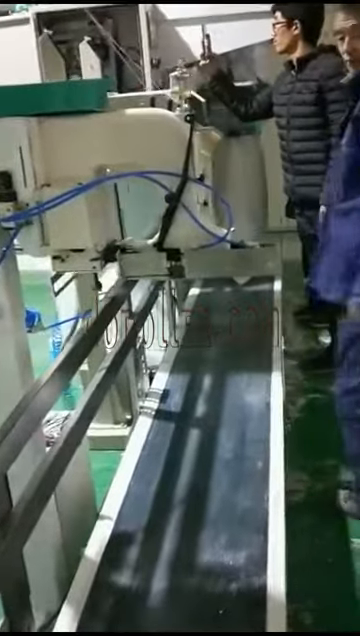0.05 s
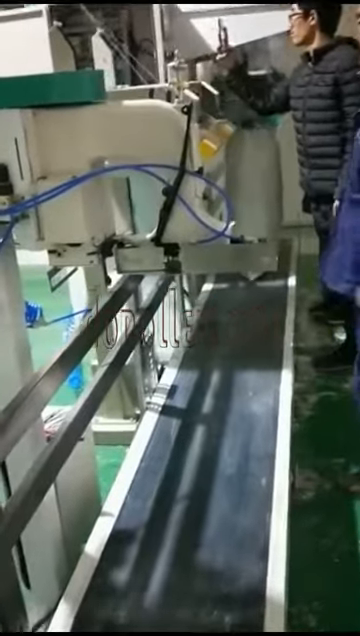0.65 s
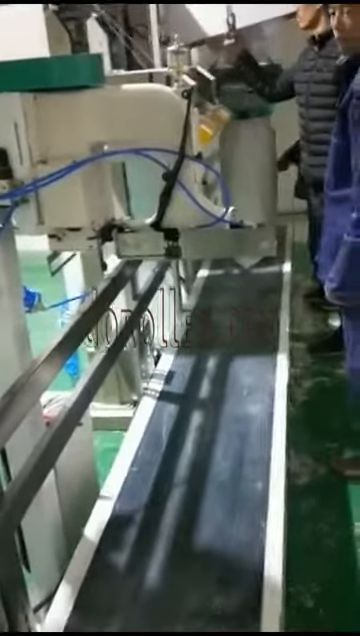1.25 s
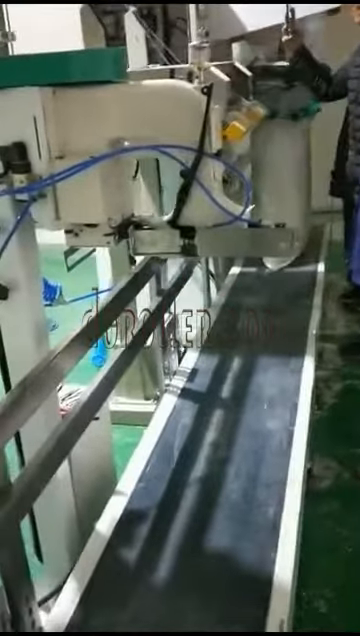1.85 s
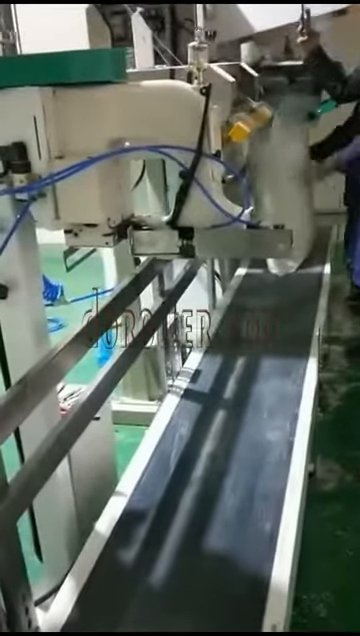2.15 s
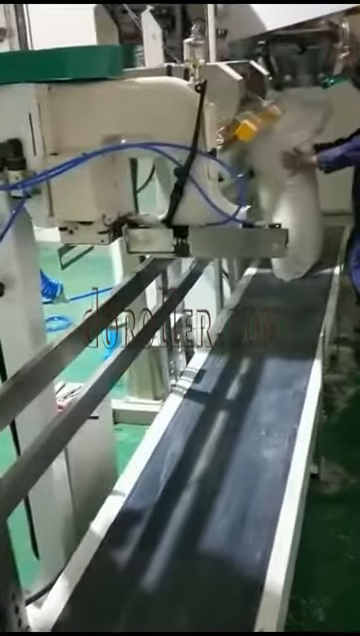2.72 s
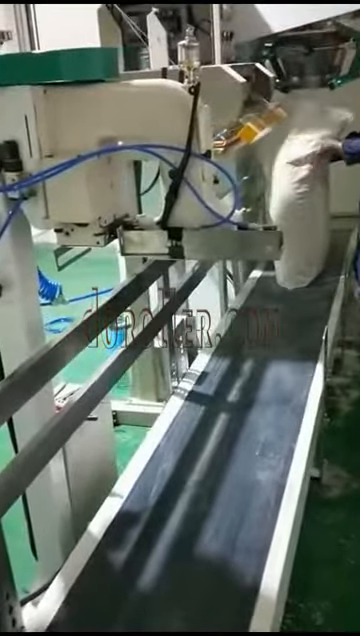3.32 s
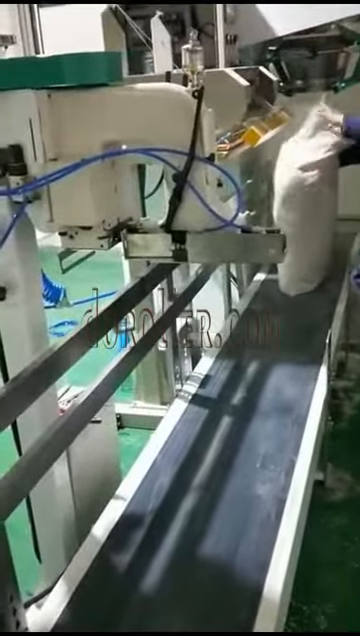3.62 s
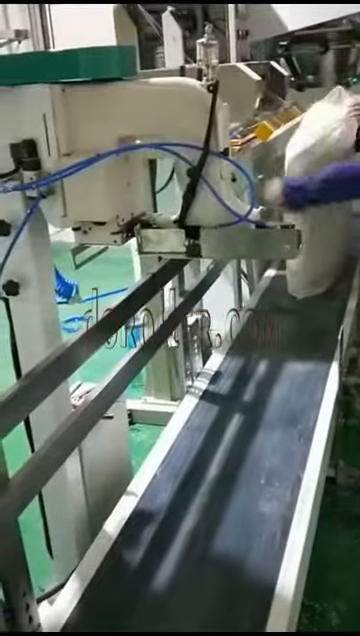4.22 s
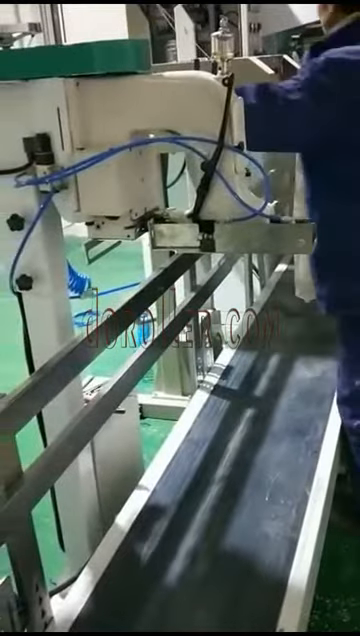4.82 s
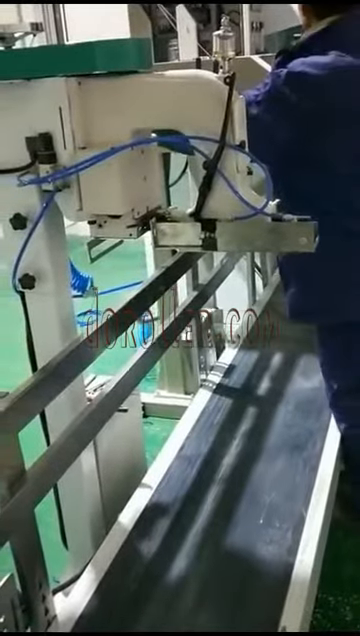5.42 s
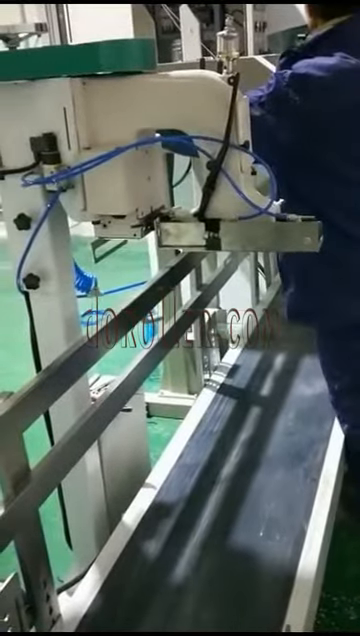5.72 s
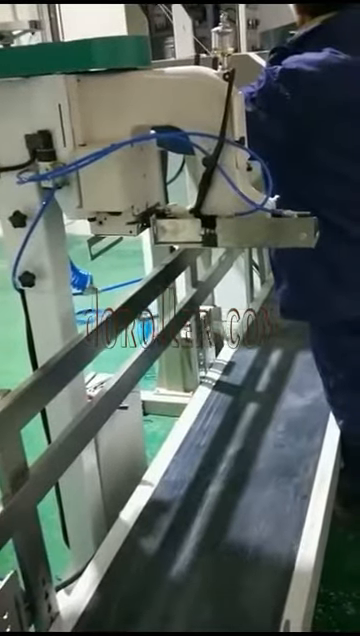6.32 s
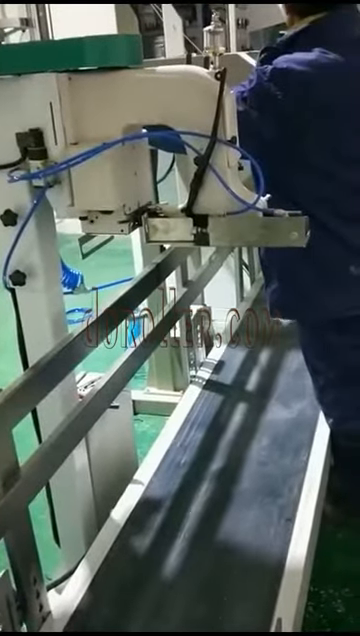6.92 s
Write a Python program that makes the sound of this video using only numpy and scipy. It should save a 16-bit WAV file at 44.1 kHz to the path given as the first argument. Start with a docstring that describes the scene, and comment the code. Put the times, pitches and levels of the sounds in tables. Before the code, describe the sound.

Compressed air hisses and puffs several times at a bag-filling station, with a few short, high squeals. The last puff comes with a brief metallic ring as the clamp lets go. After that, a woven sack crinkles lightly as it is handled. Throughout, heard from beside the filler in an echoing mill hall, heavy machinery rumbles loudly, motors hum and whine, and grain and air rush through pipes.

```python
"""Hard-walled flour mill hall, at a bag-filling station. Mills and ducts rumble, drives hum,
motors, gears and a fan whine, grain and air rush through pipes. Compressed air hisses and whistles
at the filler; valves vent in short puffs, the last as the clamp lets the full sack go.
The woven sack rustles as it is pulled upright on the belt."""
import sys
import numpy as np
from scipy import signal
from scipy.fft import rfft, irfft
from scipy.io import wavfile
from scipy.ndimage import uniform_filter1d

SR = 44100
rng = np.random.default_rng(int(sys.argv[2]) if len(sys.argv) > 2 else 0)


def master_out(mix):
    """Clip the mix to full scale and print it as 16-bit PCM to the path in sys.argv[1]."""
    frames = np.transpose(np.atleast_2d(mix))
    ceiling = np.clip(frames, -1, 1)
    pcm = np.round(ceiling * 32767).astype(np.int16)
    wavfile.write(sys.argv[1], SR, pcm)


N = 315756
TIME_S = np.arange(N) / SR
FREQS_HZ = np.maximum(np.fft.rfftfreq(N, 1 / SR), 1)

# likeness of the two ears in the hall: f/Hz, correlation
EAR_CORRELATION = [(100, 1), (200, 0.97), (330, 0.82), (520, 0.24), (850, 0.79), (1300, -0.15),
                   (1800, -0.098), (2500, 0.011), (4000, -0.0099)]
# plant noise balance, left positive: f/Hz, pan/dB
PLANT_PAN = [(90, -1.5), (170, 0), (430, 4), (680, -4), (1000, 0), (1350, 0), (2150, 8), (2550, -2),
             (3800, 4), (4700, -1), (8000, -2)]
# plant shifting from right to centre: t/s, pan/dB
PLANT_SHIFT = [(0, -2.5), (1, -2.5), (1.8, -0.5), (2.5, 0.5), (7.16, 0.1)]
# filler and sack balance: f/Hz, pan/dB
FILLER_PAN = [(700, -3), (2000, 3), (5000, -1), (10000, -1), (13300, 2), (14400, -2), (15500, -12)]

# mill rumble: f/Hz, density/dB
RUMBLE_SPECTRUM = [(10, -17.5), (25, -12.5), (42, -18.5), (60, -4.5), (76, -10), (92, -1), (125, -2.5),
                   (180, 1), (215, 2), (240, -3), (330, -5.5), (420, -9.5), (600, -21.5), (1000, -81.5)]
# duct and casing booms: f/Hz, width/Hz, lift/dB
DUCT_MODES = [(47.6, 4.1, 5.5), (83, 39, 7), (93, 25, 6), (114.4, 31, 4.5), (128.7, 2.5, 1.5),
              (132.8, 4.8, 10), (165.7, 16, 4.5), (188, 16, 5.5), (311, 5.5, 3.5), (324, 5.4, 2.5)]
# rumble base levels: t/s, deep/dB, body/dB
RUMBLE_LEVELS = [(0.0, -26.5, -22.6), (1.0, -21.0, -22.0), (2.0, -26.6, -21.7), (2.8, -21.7, -23.8),
                 (3.3, -28.0, -23.1), (4.3, -24.7, -22.2), (5.9, -23.3, -21.3), (7.16, -28.0, -25.5)]
# rumble top band: t/s, level/dB
RUMBLE_TOP_LEVEL = [(0, -27), (1, -27), (2, -28), (3.4, -29.5), (4.4, -29.5), (5.9, -27.5), (7.16, -27.5)]
# rumble heaves: t/s, length/s, deep lift/dB, body lift/dB
SURGES = [(-0.1, 0.32, 4.0, 2.0), (0.34, 0.11, 5.0, 0.0), (0.48, 0.3, 5.0, 1.5), (0.89, 0.36, 0.0, 3.5),
          (1.37, 0.22, 5.0, 2.0), (1.71, 0.32, 5.5, 2.5), (1.93, 0.19, 8.0, 0.0), (2.25, 0.23, 4.0, 2.0),
          (2.73, 0.26, 3.0, 0.0), (2.96, 0.17, 2.5, 0.5), (3.1, 0.36, 3.0, 0.0), (3.49, 0.16, 7.0, 0.0),
          (3.63, 0.18, 6.0, 1.0), (3.77, 0.18, 5.5, 0.0), (4.05, 0.16, 5.0, 0.5), (4.23, 0.11, 2.5, 0.0),
          (4.56, 0.2, 3.5, 0.5), (4.95, 0.2, 3.5, 0.0), (5.22, 0.36, 0.0, 1.5), (5.47, 0.12, 0.5, 3.0),
          (5.66, 0.29, 1.0, 2.0), (6.1, 0.15, 3.0, 5.5), (6.31, 0.12, 1.5, 2.0), (6.47, 0.22, 6.5, 0.0),
          (6.67, 0.29, 3.5, 3.0), (6.85, 0.36, 5.5, 4.5)]
# drive hums: f/Hz, level/dB re rumble
HUMS = [(48.8, -18.5), (98.3, -12), (142, -11.5), (215.3, -9.5), (368.5, -25)]
# stronger twin drive: t/s, level/dB re rumble
TWIN_LEVEL = [(0, -12), (.6, -3), (1.4, 0.5), (2.2, -13), (2.8, -1.5), (3.15, -15), (7.16, -6.5)]
# nearest motor: t/s, level/dB
MOTOR_LEVEL = [(0, -37), (.55, -44), (.75, -36), (1.35, -42), (1.5, -38), (1.92, -36.5), (2.08, -39),
               (2.22, -32), (2.45, -42), (3.0, -35.5), (3.55, -42), (3.8, -37), (4.05, -43), (4.3, -36),
               (4.48, -39), (4.6, -32), (5.0, -38), (5.45, -44), (5.72, -33), (6.1, -44), (6.38, -40),
               (6.5, -32.5), (6.7, -44), (7.16, -39)]
# motor and fan whines: f/Hz, relative level/dB, pan/dB
WHINES = [(485, -46, 2), (528, -46.5, 8), (548, -51, 0), (641, -51, 4), (676.5, -47.5, -2),
          (754, -50.5, -9), (787, -55, 0), (832, -51, -5), (861, -46.5, 3), (961, -55, 0), (1020, -50, 8),
          (1096, -53, 2), (1257, -50.5, 8), (1379, -57, 2), (1397, -57, 2), (1434, -57, 2), (1733, -55, 5),
          (1925, -52, 6), (2229, -55.5, 7), (2415, -56, 1), (2528, -55.5, 1), (2680, -61, 5),
          (4215, -65, 0)]
# gear mesh overtones: multiple, relative level/dB, pan/dB
MESH_OVERTONES = [(6, -54, -4), (9, -51, 11), (10, -53, 14), (13, -57, 11), (14, -57, 11), (19, -60, 9),
                  (20, -60, 6), (21, -63, 3), (22, -66, 1), (25, -63, 8), (26, -63, 10)]
# fan tone, swelling once: t/s, level/dB
FAN_LEVEL = [(0, -47.5), (1.2, -43), (1.7, -39), (1.86, -38), (1.95, -43), (2.2, -45), (7.16, -45.3)]
# grain and air in the pipes: f/Hz, density/dB
WASH_SPECTRUM = [(200, -29.5), (450, 6), (720, 2.5), (950, 0.5), (1200, -2), (1700, -3.5), (2250, -8),
                 (2550, -8), (3900, -13.5), (4600, -15.5), (6000, -15), (7200, -24.5), (8500, -43),
                 (10500, -73), (15000, -66)]
# pipe wash: t/s, level/dB
WASH_LEVEL = [(0, -30.5), (2.8, -32), (3.3, -33.5), (4, -31.5), (5.5, -32.5), (7.16, -31.5)]
# pipe walls: f/Hz, width/Hz, lift/dB
PIPE_MODES = [(2200, 200, 6.5), (3220, 64, -2), (3750, 70, 2), (3900, 72, 2.5)]

# air jet hiss: f/Hz, density/dB
JET_SPECTRUM = [(900, -14), (2000, -2), (3000, -.5), (4600, -1), (5700, 2), (6600, -2), (7500, -7),
                (8500, -11), (9700, -15), (10700, -12), (11900, -13), (13200, -6), (14500, -5), (15800, -7)]
# spout and shroud: f/Hz, width/Hz, lift/dB
SPOUT_MODES = [(1040, 50, 9), (2050, 260, 1.5), (2420, 250, -3), (3450, 650, 2.5), (4230, 140, -3),
               (4620, 180, -3), (4950, 140, -2), (5850, 500, 1.2), (6900, 350, -2.5), (7200, 130, 3),
               (7780, 110, 3)]
# jet openings: t/s, length/s, level/dB, pressure sag/(dB/s)
JET_BURSTS = [(-.07, 0.081, -25, 10), (0.23, 0.64, -26, 5.5), (0.83, 0.26, -28.5, -7),
              (1.416, 0.53, -32, -1.5), (1.82, 0.76, -26.5, 3)]
# filler casing ring: f/Hz, density/dB
CASING_SPECTRUM = [(120, -27), (220, -1), (380, -2.5), (600, -4.5), (900, -12.5), (1400, -15), (3000, -27),
                   (5500, -24.5), (9000, -45)]
# valves cracking open: t/s, level/dB, rise/s, hold/s, t60/s
SPITS = [(.245, -31, .045, .06, .5), (1.89, -27.5, .012, .04, .4), (2.562, -28.8, .02, .018, .3)]
# valves venting: t/s, level/dB, rise/s, hold/s, body t60/s
PUFFS = [(0.802, -28.5, 0.024, 0.15, 2.4), (1.868, -31, 0.027, 0.17, 1.9), (2.537, -21, 0.034, 0.044, 1.8)]
# vented air: f/Hz, density/dB
PUFF_SPECTRUM = [(500, -24), (800, 2), (1030, 0.5), (1400, 2.5), (1950, 3.5), (2800, -1.5), (4500, -0.5),
                 (5500, 3), (6800, -4.5), (8200, -12), (10000, -41), (15000, -32)]
# spout edge tones: t/s, length/s, start/Hz, end/Hz, roughness 0-1, level/dB
WHISTLES = [(.812, .042, 1880, 1940, .95, -27.5), (.872, .055, 1980, 2070, .95, -29),
            (1.635, .06, 2040, 2070, .2, -36), (1.65, .17, 1870, 1935, .9, -36.5),
            (1.69, .17, 1830, 1855, .85, -36), (1.795, .06, 1985, 2050, .4, -36.5),
            (1.848, .068, 2046, 2038, .12, -29), (1.968, .048, 2030, 2058, .3, -33.5),
            (2.105, .06, 2042, 2042, .1, -34.5)]
# clamp release: f/Hz, density/dB
JAW_SPECTRUM = [(700, -8), (2000, -7), (4000, -30), (9000, -51)]
# clamp jaws: f/Hz, width/Hz, lift/dB
JAW_MODES = [(845, 25, 16), (1020, 55, 26), (1130, 30, 20), (1290, 30, 16), (1950, 70, 14)]

# sack handling: t/s, length/s, level/dB
RUSTLES = [(3.253, .07, -65), (3.42, .07, -49), (3.69, 0.23, -42), (3.91, 0.31, -40), (4.126, 0.25, -44.5),
           (4.336, 0.27, -46), (4.844, .04, -56), (4.91, .05, -58), (5.018, 0.12, -49), (5.135, 0.19, -50),
           (5.33, 0.14, -56), (5.476, 0.12, -59), (5.97, .05, -60), (6.14, .05, -55), (6.26, .04, -53),
           (6.495, .05, -57), (6.638, 0.34, -48), (6.93, 0.28, -49.5)]
# creases snapping: t/s, level/dB
SNAPS = [(3.432, -52), (3.728, -44), (4.266, -47), (5.030, -46), (5.325, -45), (6.138, -41), (6.184, -47),
         (6.955, -50)]
# crinkling weave: f/Hz, density/dB
CLOTH_SPECTRUM = [(1500, -3), (3000, 5), (6000, 7), (8000, -3), (10000, -17.5), (12000, -14.5),
                  (14000, -5.5), (15800, -22.5)]
# sack on the guide: f/Hz, density/dB
SWISH_SPECTRUM = [(3000, -1), (5000, -3.5), (6200, -1.5), (7400, -4.5), (8600, -2.5), (9600, -16),
                  (11000, -25), (15000, -33)]


def from_db(db):
    """Decibels to gain."""
    return 10 ** (np.asarray(db) / 20)


def unit_rms(x):
    """Scale to unit power."""
    return x / np.sqrt(np.mean(x ** 2) + 1e-20)


def over_time(rows):
    """Interpolate (t/s, value) rows."""
    return np.interp(TIME_S, *np.transpose(rows))


def over_freq(rows):
    """Interpolate (f/Hz, value) rows in log frequency."""
    hz, value = np.transpose(rows)
    return np.interp(np.log(FREQS_HZ), np.log(hz), value)


def panned(pan_db):
    """Constant-power left and right gains."""
    gains = from_db(np.array([[.5], [-.5]]) * pan_db)
    return gains / np.sqrt(np.mean(gains ** 2, axis=0))


def drift(rate_hz):
    """Smooth random curve, rms 1."""
    step, settle = 40, 2000
    pole = np.exp(-2 * np.pi * rate_hz * step / SR)
    white = rng.standard_normal(N // step + settle + 2)
    slow = signal.lfilter([1], [1, -2 * pole, pole * pole], white)[settle:]
    return np.interp(np.arange(N) / step, np.arange(len(slow)), unit_rms(slow))


def hall_noise(spectrum, pan, modes=()):
    """Diffuse noise coloured by modes: ears alike in the bass, unrelated in the treble; rms 1."""
    mid, side = rfft(rng.standard_normal((2, N)))
    alike = over_freq(EAR_CORRELATION)
    ears = np.sqrt(1 + alike) * mid + np.sqrt(1 - alike) * side * [[1], [-1]]
    low_cut = np.minimum(FREQS_HZ / spectrum[0][0], 1) ** 2
    lift = 1 + sum((from_db(db) - 1) / (1 + (2 * (FREQS_HZ - hz) / width_hz) ** 2)
                   for hz, width_hz, db in modes)
    colour = from_db(over_freq(spectrum)) * low_cut * lift
    return unit_rms(irfft(ears * colour * panned(over_freq(pan)), N))


def tone(hz, wander_hz, fade_db, spread_rad):
    """Wandering sine; standing waves shift its level and the phase between the ears."""
    phase = 2 * np.pi * (np.cumsum(hz + wander_hz * drift(2.99)) / SR + rng.random())
    offset = spread_rad * drift(.9) * np.array([[1], [-1]])
    fading = unit_rms(from_db(fade_db * np.tanh(drift(4.8))))
    return np.sqrt(2) * fading * np.sin(phase + offset)


def rough_tone(pitch_hz, width_hz):
    """Narrow noise around a pitch curve, independent at each ear."""
    phase = 2 * np.pi * np.cumsum(pitch_hz) / SR
    return np.array([drift(width_hz) * np.cos(phase) + drift(width_hz) * np.sin(phase)
                     for ear in range(2)])


def burst(start_s, level_db, rise_s, hold_s, t60_s):
    """Envelope: linear rise, hold, exponential decay."""
    age_s = TIME_S - start_s
    decay = np.exp(-np.log(1000) * np.maximum(age_s - rise_s - hold_s, 0) / t60_s)
    return from_db(level_db) * np.clip(age_s / rise_s, 0, 1) * decay


def hall_tail(envelope, t60_s):
    """Limit an envelope's fall to the reverberant decay."""
    fall = np.log(1000) * TIME_S / t60_s
    return np.exp(np.maximum.accumulate(np.log(envelope + 1e-12) + fall) - fall)


def arch(start_s, length_s):
    """Half-sine envelope."""
    return np.sin(np.pi * np.clip((TIME_S - start_s) / length_s, 0, 1))


def swell(start_s, length_s, level_db, t60_s):
    """Half-sine envelope with a hall tail."""
    return from_db(level_db) * hall_tail(arch(start_s, length_s), t60_s)


def split(x, hz, order=6):
    """Bands below and above hz."""
    low = irfft(rfft(x) / (1 + (FREQS_HZ / hz) ** order), N)
    return low, x - low


def levelled(x, span_s):
    """Hold power at 1 over span_s; faster beats remain."""
    count = int(span_s * SR)
    power = uniform_filter1d(np.mean(x ** 2, axis=0), count)
    return x / np.sqrt(uniform_filter1d(power, count // 2))


def drives(twin_hz=113.8, beat_hz=1.42, crest_s=.7, weaker_db=-11.5):
    """Drives hum; two at nearly the same speed beat."""
    beat = abs(1 + from_db(weaker_db) * np.exp(2j * np.pi * beat_hz * (TIME_S - crest_s)))
    twins = beat * tone(twin_hz, wander_hz=.82, fade_db=4, spread_rad=.08)
    hums = sum(from_db(db) * tone(hz, wander_hz=.47, fade_db=5, spread_rad=.096) for hz, db in HUMS)
    return from_db(over_time(TWIN_LEVEL)) * twins + hums


def mills(throb_hz=2.3, crest_s=.19, throb_db=.5, uneven_db=1.1, uneven_hz=14):
    """Shaking through booming ducts, plus drive hum; deep and body bands heave separately."""
    rumble = hall_noise(RUMBLE_SPECTRUM, PLANT_PAN, DUCT_MODES) + drives()
    deep, rest = split(rumble, hz=130, order=16)
    body, top = split(rest, hz=260, order=16)
    deep_db, body_db = (over_time(np.array(RUMBLE_LEVELS)[:, [0, k]]) for k in (1, 2))
    for start_s, length_s, deep_lift_db, body_lift_db in SURGES:
        lump = arch(start_s, length_s)
        deep_db += deep_lift_db * lump
        body_db += body_lift_db * lump
    sway_db = throb_db * np.cos(2 * np.pi * throb_hz * (TIME_S - crest_s))
    sway_db += uneven_db * drift(uneven_hz)
    deep_db += uneven_db * drift(uneven_hz)
    return (levelled(deep, span_s=.11) * from_db(deep_db)
            + levelled(body, span_s=.11) * from_db(body_db + sway_db)
            + levelled(top, span_s=.22) * from_db(over_time(RUMBLE_TOP_LEVEL) + sway_db))


def motors(whine_gain_db=1):
    """Whines wander with shaft speed; the nearest motor swells and fades."""
    nearest = tone(hz=490, wander_hz=1.5, fade_db=1.5, spread_rad=.45)
    out = from_db(over_time(MOTOR_LEVEL)) * panned(3) * nearest
    for hz, db, pan_db in WHINES:
        whine = tone(hz, wander_hz=1.198, fade_db=4.5, spread_rad=.97)
        out += from_db(db + whine_gain_db) * panned(pan_db) * whine
    return out


def gearbox(mesh_hz=149.85, shaft_hz=20, sidebands_above_hz=3000, gain_db=2, sideband_db=-.5):
    """Tooth-mesh overtones; the shaft adds sidebands to the high ones."""
    out = 0
    for multiple, db, pan_db in MESH_OVERTONES:
        hz = multiple * mesh_hz
        for side in (-1, 0, 1) if hz > sidebands_above_hz else (0,):
            gain = from_db(gain_db + db + sideband_db * abs(side)) * panned(pan_db)
            out += gain * tone(hz + side * shaft_hz, wander_hz=1.3, fade_db=1, spread_rad=.94)
    return out


def fan(blade_hz=1055):
    """Blade tone in a narrow skirt of turbulence."""
    blades = tone(blade_hz, wander_hz=3, fade_db=1.5, spread_rad=.4)
    turbulence = rough_tone(np.full(N, blade_hz), width_hz=10)
    return from_db(over_time(FAN_LEVEL)) * panned(1) * (.92 * blades + .35 * turbulence)


def pipes(flutter_db=.5):
    """Grain and air rush through ringing pipework."""
    wash = hall_noise(WASH_SPECTRUM, PLANT_PAN, PIPE_MODES)
    return wash * from_db(over_time(WASH_LEVEL) + flutter_db * drift(25))


def air_jet(rise_s=.066, flutter_db=.7):
    """Compressed air bursts open fast, sag or build, then shut; treble dies first."""
    flow = np.zeros(N)
    for start_s, length_s, db, sag_db_per_s in JET_BURSTS:
        age_s = np.maximum(TIME_S - start_s, 0)
        gate = np.minimum(age_s / rise_s, 1) * (age_s < length_s)
        flow = np.maximum(flow, gate * from_db(db - sag_db_per_s * age_s))
    flow *= from_db(flutter_db * drift(24))
    body, treble = split(hall_noise(JET_SPECTRUM, FILLER_PAN, SPOUT_MODES), hz=5800)
    return body * hall_tail(flow, t60_s=.78) + treble * hall_tail(flow, t60_s=.51)


def casing():
    """The filler casing rings out after a stroke."""
    stroke = burst(start_s=-.01, level_db=-21.3, rise_s=.01, hold_s=.06, t60_s=1.7)
    return hall_noise(CASING_SPECTRUM, FILLER_PAN) * stroke


def valves(treble_t60_s=.74):
    """Valves spit on opening and vent in broad puffs; the hall absorbs treble sooner."""
    body, treble = split(hall_noise(PUFF_SPECTRUM, FILLER_PAN), hz=2700)
    puffs = sum(body * burst(*opening, body_t60_s) + treble * burst(*opening, treble_t60_s)
                for *opening, body_t60_s in PUFFS)
    spits = hall_noise(JET_SPECTRUM, FILLER_PAN, SPOUT_MODES) * sum(burst(*row) for row in SPITS)
    return puffs + spits


def whistles():
    """Edge tones at the spout, mostly gliding up: early ones rough, later ones a clean squeal."""
    out = 0
    for start_s, length_s, start_hz, end_hz, roughness, db in WHISTLES:
        pitch_hz = np.interp(TIME_S, [start_s, start_s + length_s], [start_hz, end_hz])
        clean = tone(pitch_hz, wander_hz=3, fade_db=.5, spread_rad=.4)
        rough = rough_tone(pitch_hz, width_hz=115)
        edge = np.sqrt(1 - roughness) * clean + np.sqrt(roughness) * rough
        out += edge * swell(start_s, length_s, db, t60_s=.27)
    return out * panned(4)


def clamp():
    """The jaws ring as they open."""
    release = burst(start_s=2.558, level_db=-29.5, rise_s=.025, hold_s=.19, t60_s=.7)
    return hall_noise(JAW_SPECTRUM, FILLER_PAN, JAW_MODES) * release


def sack(grain_db=2.5, grain_hz=150, clump_db=2.8, clump_hz=18, snap_tail_db=-11):
    """Gripped weave crinkles in clumps and snaps; it swishes along the guide."""
    grains = unit_rms(from_db(grain_db * drift(grain_hz) + clump_db * np.tanh(drift(clump_hz))))
    rustles = grains * sum(swell(*row, t60_s=.26) for row in RUSTLES)
    snaps = sum(burst(*row, rise_s=.001, hold_s=.001, t60_s=.025) for row in SNAPS)
    snaps = np.maximum(snaps, from_db(snap_tail_db) * hall_tail(snaps, t60_s=.35))
    crinkle = hall_noise(CLOTH_SPECTRUM, FILLER_PAN) * np.hypot(snaps, rustles)
    slide = swell(start_s=4.263, length_s=.43, level_db=-39, t60_s=.6)
    return crinkle + hall_noise(SWISH_SPECTRUM, FILLER_PAN) * slide


def scene():
    """Plant, filler and sack."""
    plant = mills() + motors() + gearbox() + fan() + pipes()
    filler = air_jet() + valves() + clamp() + casing() + whistles()
    return plant * panned(over_time(PLANT_SHIFT)) + filler + sack()


def record(dry):
    """Steep low-pass."""
    cutoff_hz = 15750
    return signal.sosfilt(signal.ellip(12, .1, 90, cutoff_hz, fs=SR, output="sos"), dry)


dry = scene()
out = record(dry)
master_out(out)
```